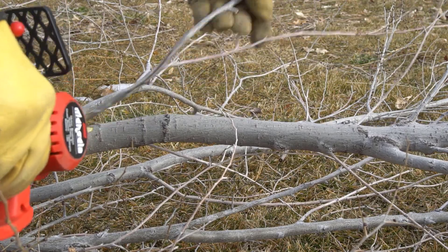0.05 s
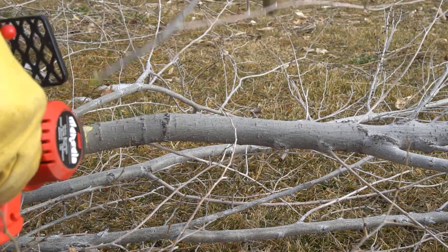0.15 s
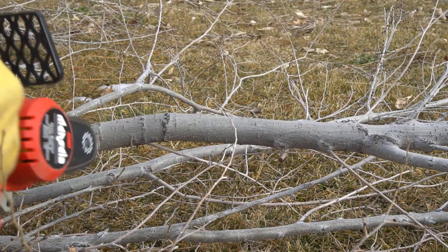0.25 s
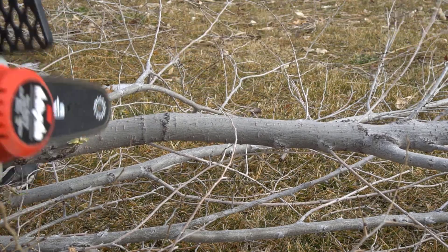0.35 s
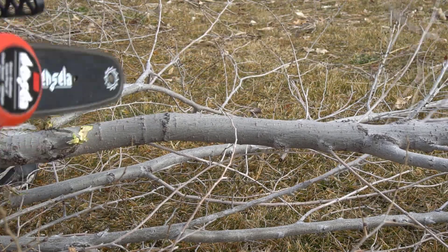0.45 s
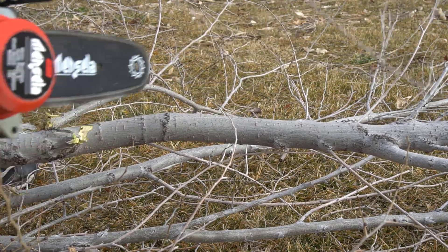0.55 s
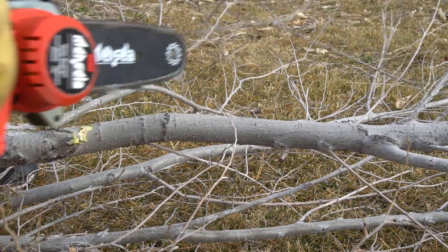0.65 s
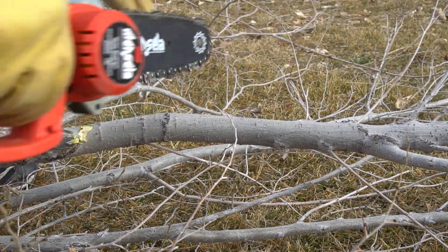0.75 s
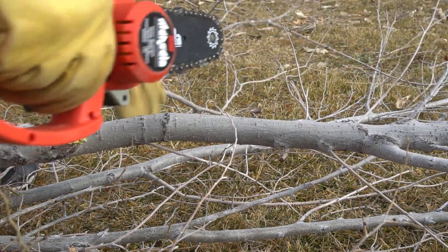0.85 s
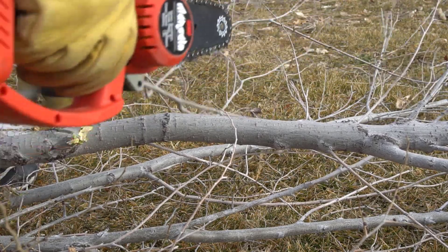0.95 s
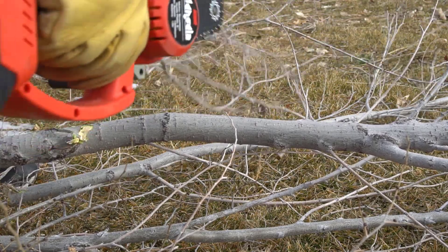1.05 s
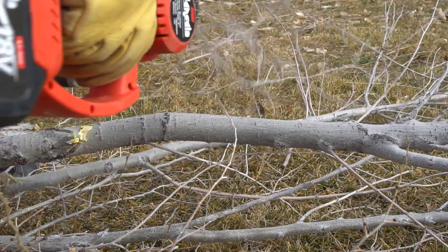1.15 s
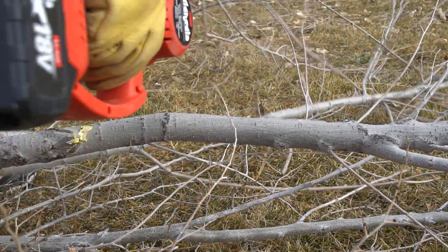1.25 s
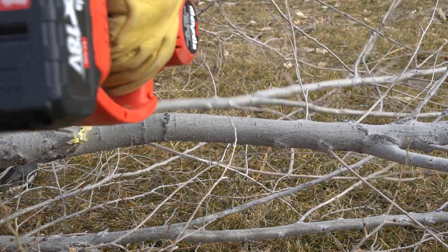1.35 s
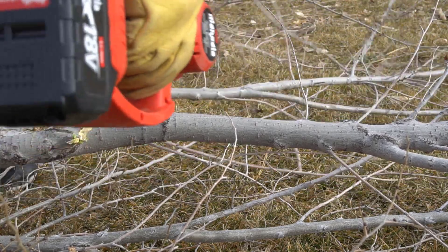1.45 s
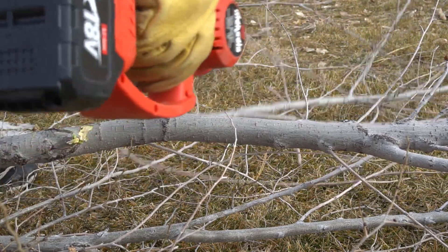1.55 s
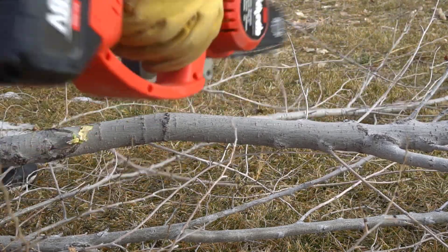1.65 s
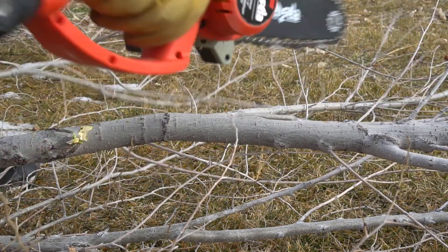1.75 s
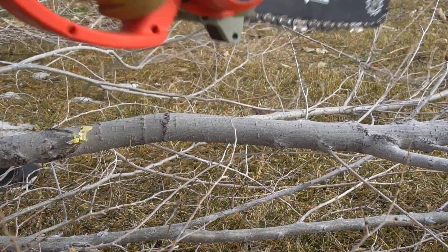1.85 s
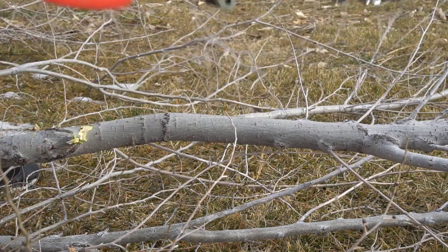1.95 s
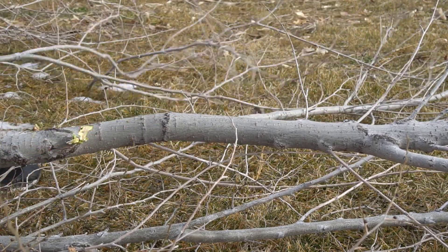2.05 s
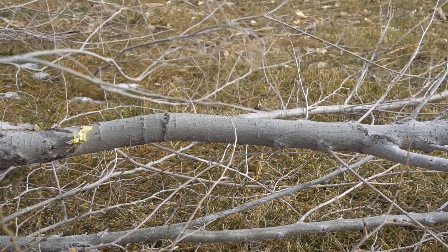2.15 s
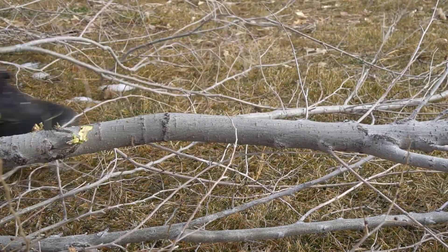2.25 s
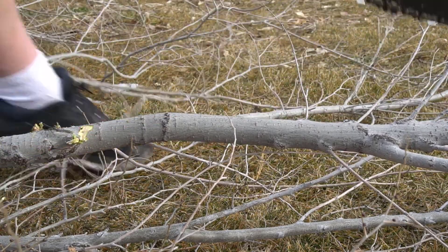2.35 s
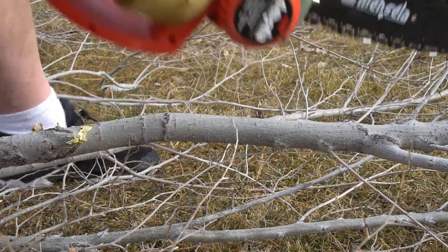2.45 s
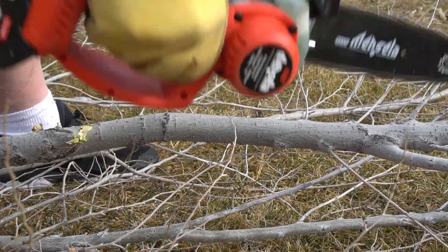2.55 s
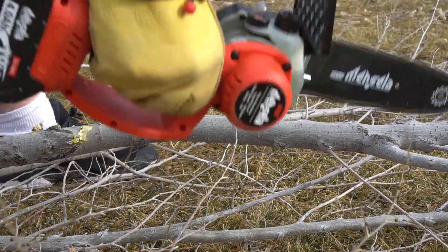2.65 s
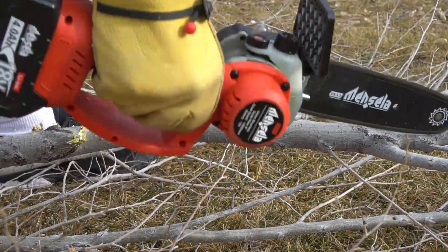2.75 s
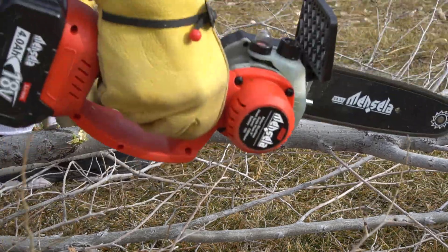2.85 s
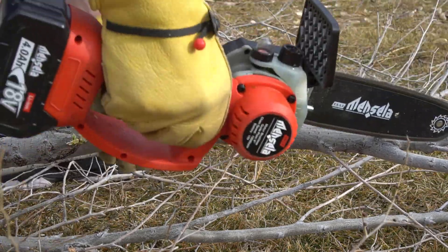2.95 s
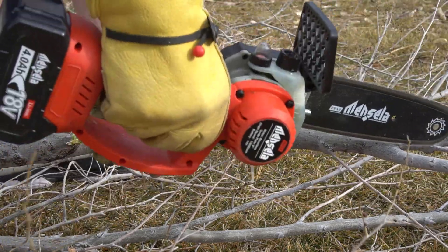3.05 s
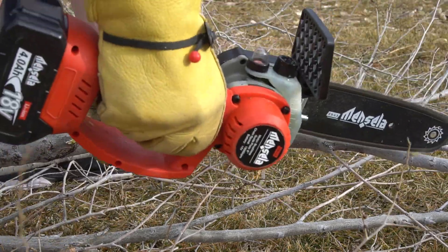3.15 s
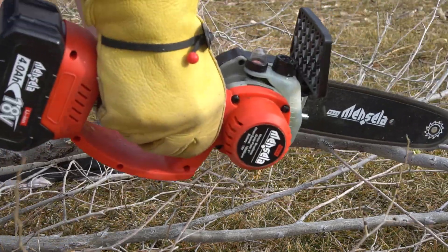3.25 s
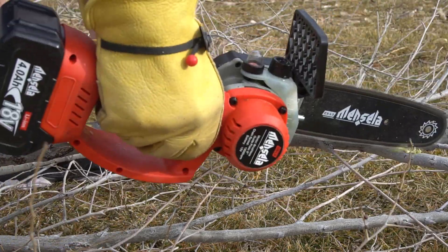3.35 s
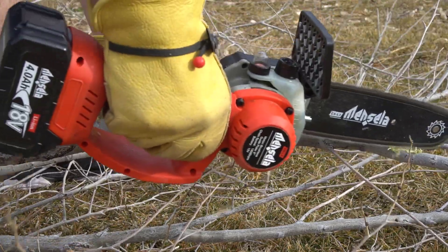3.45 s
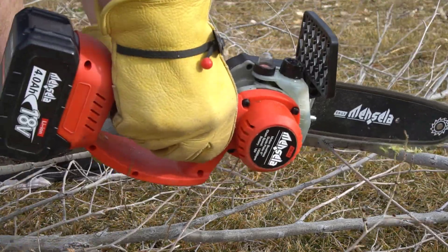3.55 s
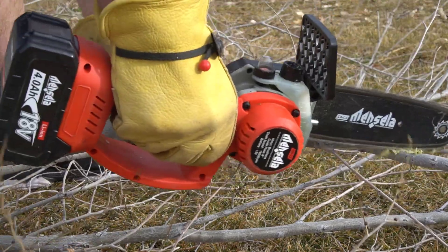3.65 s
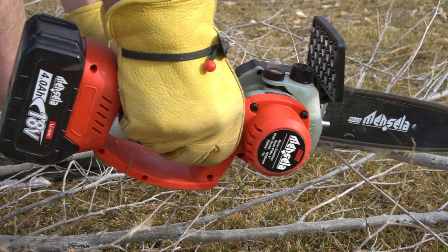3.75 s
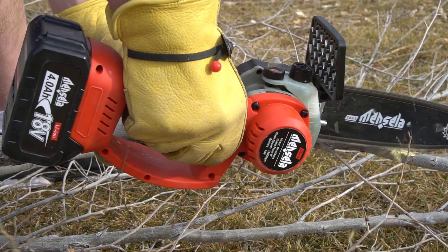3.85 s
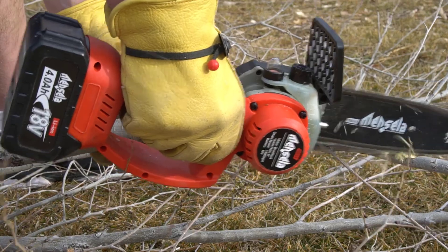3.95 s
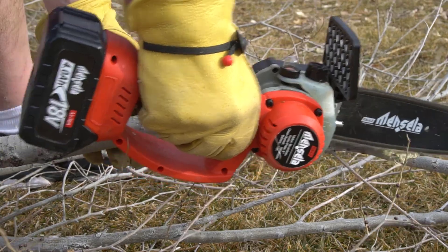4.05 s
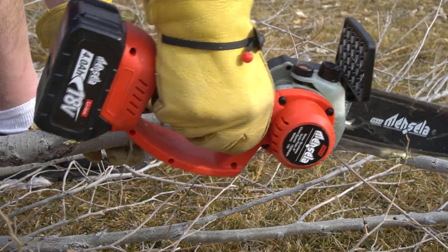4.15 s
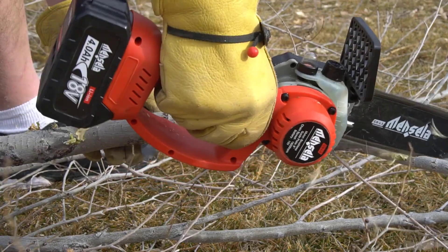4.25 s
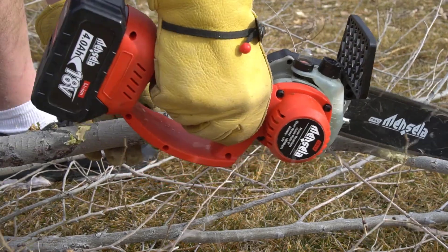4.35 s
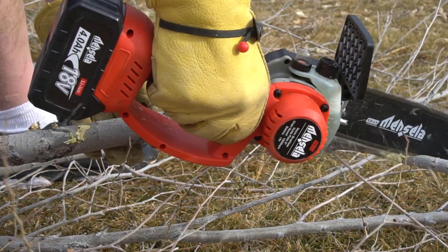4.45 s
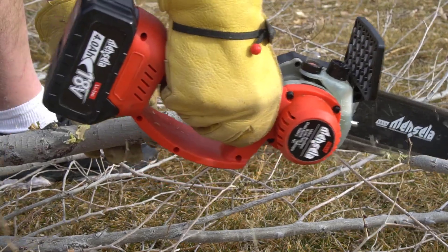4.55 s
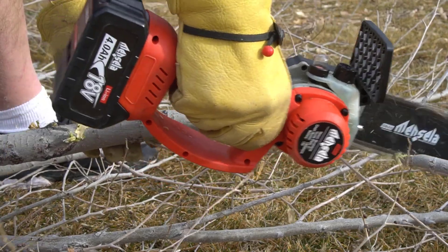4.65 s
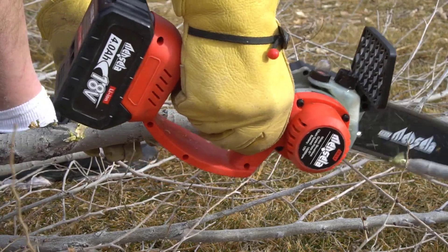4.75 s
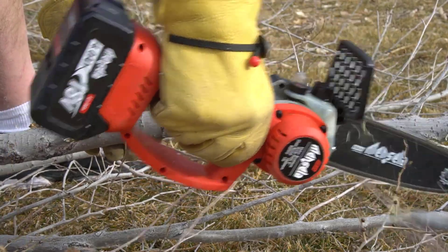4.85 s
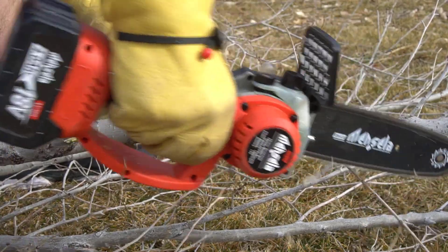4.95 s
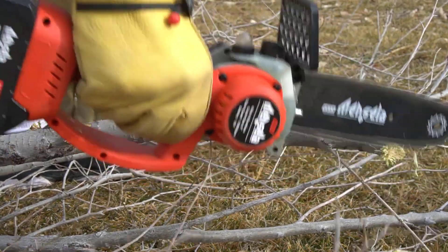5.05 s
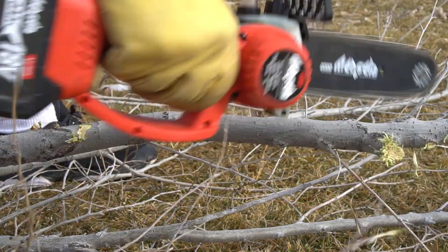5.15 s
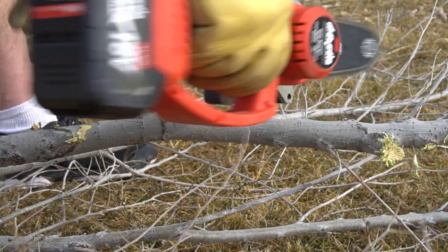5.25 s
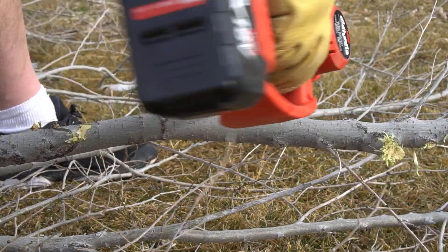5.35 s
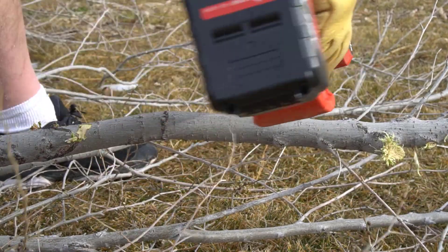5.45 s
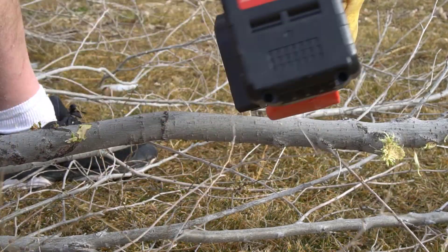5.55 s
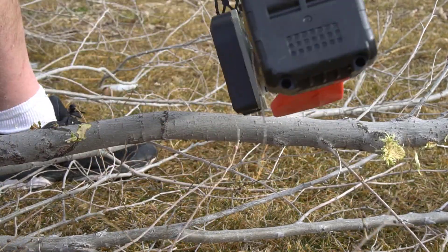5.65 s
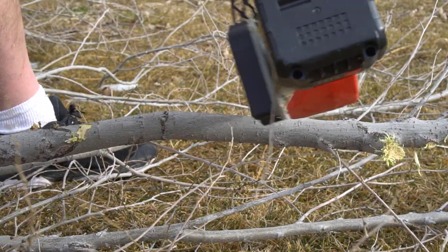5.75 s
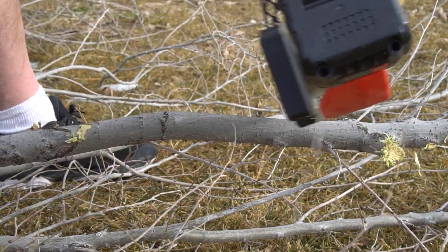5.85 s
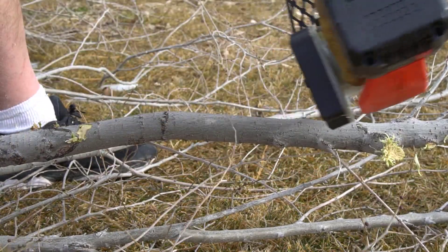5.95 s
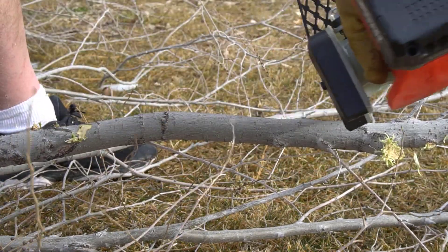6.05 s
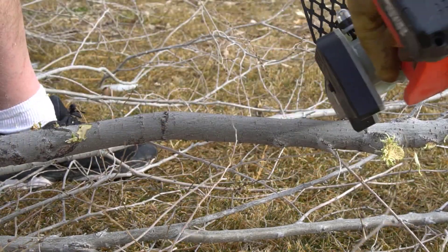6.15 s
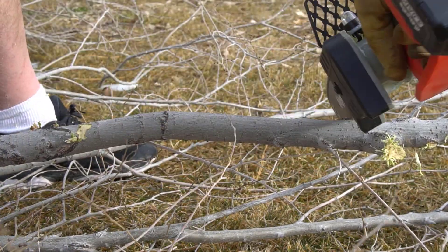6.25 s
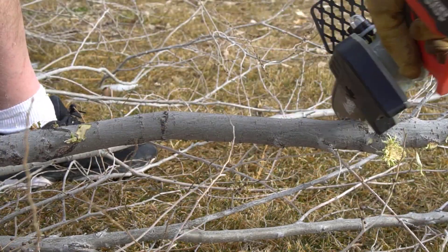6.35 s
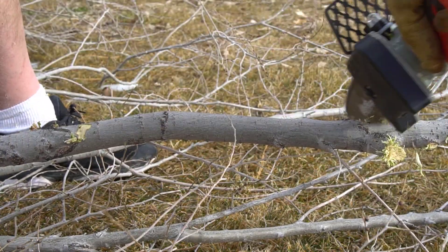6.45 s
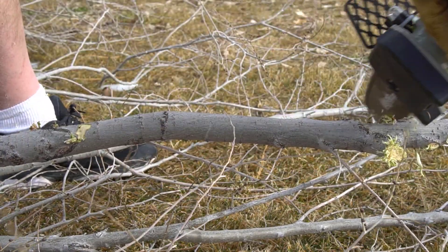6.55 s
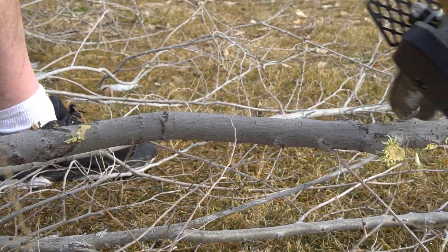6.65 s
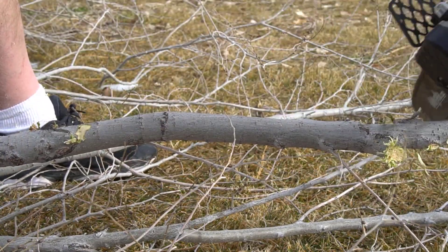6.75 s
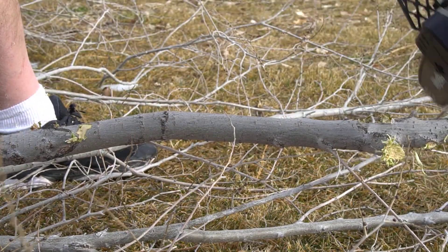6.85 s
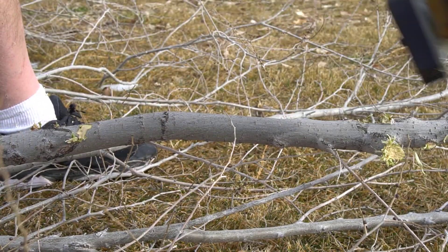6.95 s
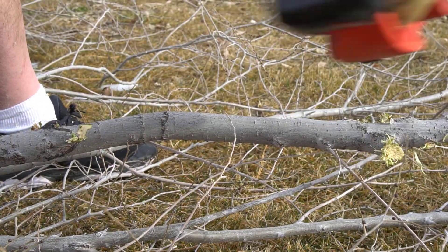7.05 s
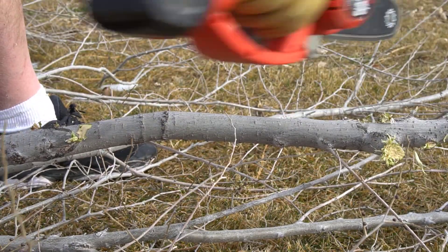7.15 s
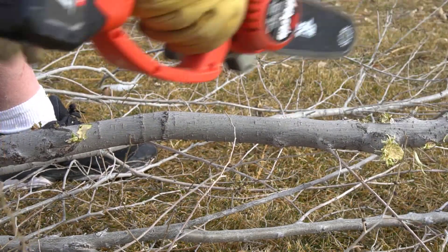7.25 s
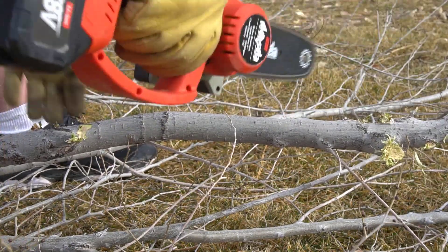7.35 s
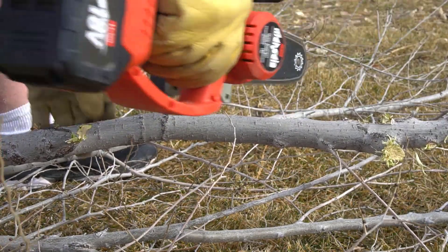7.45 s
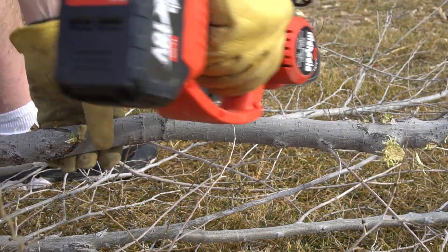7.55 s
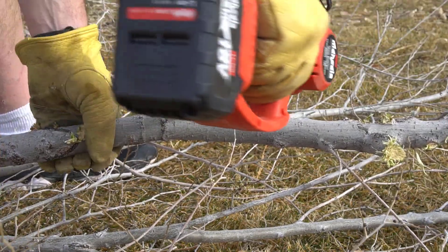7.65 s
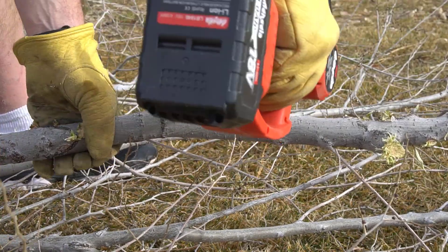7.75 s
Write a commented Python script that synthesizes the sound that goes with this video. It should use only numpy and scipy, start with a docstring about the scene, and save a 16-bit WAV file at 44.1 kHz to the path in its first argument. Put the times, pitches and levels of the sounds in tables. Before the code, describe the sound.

A handheld electric chainsaw, close and dry in open air: hissing, clattering chain links and singing gears coast to silence within a second. Small plastic ticks and brittle twigs rustle for a moment and a half. Two sharp clicks, then the motor climbs smoothly, bites wood with uneven judder, clears it, and whirrs on steadily with shifting tone as the tool turns, dipping slightly once.

```python
"""A small battery chainsaw outdoors, near a stereo pair of microphones: chain links rattle in the bar and
housing as noisy knocks through resonances, while motor, gear and fan whine as sines on the shaft speed.
It runs down, stops, soft-starts, chatters through a branch, runs free, cuts again lightly and runs free.
In the pause the trigger and twigs click as short noise bursts, and twigs rustle as clumps of tiny cracks.
Behind it all lies a distant rumble and drone of slowly uneven noise."""
import sys
import numpy as np
from scipy import signal
from scipy.fft import rfft, irfft, next_fast_len
from scipy.io import wavfile
from scipy.ndimage import uniform_filter1d, map_coordinates

SR = 44100
rng = np.random.default_rng(int(sys.argv[2]) if len(sys.argv) > 2 else 0)


def volts_from_decibels(level):
    """Turn decibel levels (scalar or array-like) into linear amplitude factors."""
    exponent = np.asarray(level, float) / 20
    return 10 ** exponent


def wav_record(signal):
    """Record a signal, one row per channel, as 16-bit PCM in the file named by sys.argv[1]."""
    frames = np.transpose(np.atleast_2d(signal))
    bounded = np.clip(frames, -1, 1)
    # unit amplitude maps onto the largest positive 16-bit level
    quanta = np.round(bounded * 32767).astype(np.int16)
    wavfile.write(sys.argv[1], SR, quanta)


N = 344421  # length in samples

# speed of the motor shaft: t/s, speed/turns per s
SHAFT_SPEED = [(0, 268), (.2, 282), (.4, 283), (.85, 60), (2.5, 70), (2.67, 100), (2.95, 155), (3.07, 178),
               (3.23, 206), (3.38, 233), (3.44, 250), (3.72, 259), (3.97, 279), (4.06, 260), (4.7, 264),
               (4.9, 281), (5, 282.6), (6.05, 283), (6.3, 274), (6.7, 275), (6.9, 282.6), (7.81, 283)]
# the chain is in the wood: start/s, end/s, load/0-1
CUTS = [(3.473, 4.84, 0.66), (6.16, 6.83, 0.04)]
# rattle level, including its fall as the chain runs down, and how the saw is turned and placed:
# t/s, bar level/dB, motor side turned to the microphones/0-1, left over right/dB
RATTLE_AND_PLACE = [(0, -25.5, 0.8, 2), (.3, -25.5, 1, 2.2), (.5, -28.5, 1, 2), (.65, -33, 1, 1),
                    (.81, -49, .6, 3.5), (.89, -72, .3, 5), (2.5, -27, 0, -2.5), (2.7, -22, 0.14, -2.5),
                    (3, -22, 0.2, -2.1), (3.2, -24, 0.34, -2.5), (3.42, -22.5, 0.15, -2.3),
                    (3.6, -23.5, 0.12, -2.5), (3.88, -23, 0, -3), (4.2, -26, 0.04, -3.5),
                    (4.8, -26, 0.29, -3.1), (5.15, -24, 0.3, -1), (5.35, -27, 0.72, -1.8),
                    (5.7, -25.5, 0.68, -1.6), (6.14, -25.5, 0.77, -2.5), (6.3, -23, 0.44, -2.5),
                    (6.65, -25, 0.58, -4), (6.93, -26.5, 0.52, -4.5), (7.08, -24.5, 0.46, -3.5),
                    (7.3, -27, 1, -0.5), (7.81, -25, 0.63, -1.4)]
# short bumps in the rattle, most of them while cutting: t/s, jolt/dB before each part takes its share
BUMPS = [(2.7, 1.5), (3.745, 4), (4.035, 3), (4.078, 1.5), (4.135, 3), (4.168, 4), (4.196, 4.5), (4.25, 5),
         (4.305, 4.5), (4.336, 4), (4.387, 6), (4.439, 6.5), (4.483, 5), (4.521, 5), (4.585, 5),
         (4.65, 3.5), (4.696, 5), (4.764, 1.5), (4.846, 3.5), (7.468, 2)]
# short jolts in the rattle, nearly all dips, most of them while cutting:
# t/s, jolt/dB before each part takes its share
DIPS_MOSTLY = [(2.73, -2), (3.476, -5), (3.563, -5.5), (3.72, -3), (4.017, -8.5), (4.107, -5), (4.215, -1),
               (4.277, -2.5), (4.461, 0.5), (4.67, -2), (6.394, -2.5), (6.479, -1.5), (6.631, -4),
               (6.808, -3.5), (7.521, -4.5)]
# the housing rings out louder for a while: start/s, end/s, gain/dB
RINGING = [(-.1, .25, 3.5), (0.506, .72, 3.5), (2.883, 3.218, 5.5), (5.32, 5.757, 4.5), (6.154, 6.5, 3),
           (7.404, 7.9, 2.5)]
# resonances of the steel bar: f/Hz, width/Hz, relative level/dB
BAR_MODES = [(3580, 425, -8), (4290, 600, -6), (5310, 1600, -7.5), (7220, 910, -5.5), (8430, 555, -2),
             (9500, 530, -8)]
# hissing treble of the links, relative: f/Hz, level/dB
SIZZLE_SPECTRUM = [(7000, -30), (8300, -20), (9600, 3), (10800, 3.5), (12000, 3.5), (13700, 5), (16000, -3)]
# resonances of the plastic parts, before the rattle sharpens them: f/Hz, width/Hz, relative level/dB
HOUSING_MODES = [(1160, 237, -3), (1246, 220, 3.5)]
HANDLE_MODES = [(992, 170, -10.5), (1044, 68, 0.5), (1101, 250, -7.5)]
BATTERY_MODES = [(450, 140, -6), (810, 170, 0)]
GUARD_MODES = [(2007, 397, -0.5), (2216, 333, 1), (2830, 890, -4)]
# each part against the bar: turned away/dB, gained when facing/dB, gained as the speed nears zero/dB
SIZZLE_LEVEL = (-2.5, 7.5, 1)
HOUSING_LEVEL = (-15.5, 6, 0)
HANDLE_LEVEL = (-21, 3, 21)
GUARD_LEVEL = (-7, 2.5, 2.5)
# stereo width of bar and sizzle, same columns: away/dB, facing/dB, slow/dB
SPREAD_LEVEL = (-3, 3.5, -5)
# orders of the shaft that sing out as the saw turns in the hand; 8 motor, 10.42 gear mesh, 13 fan
# per order: start/s, end/s, level/dB before slow fading
SINGING_ORDERS = {8: [(.18, .4, -35), (2.6, 2.78, -44), (2.78, 3.03, -34.5), (5.0, 5.2, -36),
                  (5.36, 6.03, -38), (6.97, 7.19, -31), (7.38, 7.6, -37), (7.6, 7.9, -34)],
                  10.42: [(.06, .22, -34.5), (.32, .42, -36), (3.04, 3.41, -33.5), (3.76, 3.98, -39),
                  (4.87, 5.12, -35.5), (5.2, 5.58, -42), (5.7, 6.14, -37.5), (7.3, 7.52, -40.5)],
                  13: [(.16, .4, -34), (4.88, 5.1, -36), (5.14, 5.56, -36), (7.0, 7.5, -32),
                  (7.5, 7.9, -36)]}
# weaker shaft orders that hum: multiple of shaft speed, level/dB before speed, load and resonance
HUM_ORDERS = [(1, -57.5), (1.517, -56.5), (3.034, -66), (4, -48)]
# weaker shaft orders that whistle: multiple of shaft speed, level/dB before resonance
WHISTLE_ORDERS = [(16, -51), (20, -54), (20.84, -50)]
# trigger and twig clicks: t/s, relative level/dB, duller body relative to that/dB
CLICKS = [(0.8403, -36, 5), (0.863, -20, -9), (1.0401, -49, -15), (1.1678, -35, -9), (1.212, -33, -20),
          (1.302, -37, -20), (1.3872, -41, -22), (1.665, -46, -12), (1.833, -43, -17), (2.0537, -33, -29),
          (2.2423, -46, 1), (2.2653, -43, -12), (2.366, -28.5, -30), (2.4318, -27.5, -18),
          (2.468, -12.5, -22), (2.515, -14, -2.5)]
# small plastic and wood resonances: f/Hz, width/Hz, level/dB
CLICK_MODES = [(3040, 200, -7), (6400, 126, 5.5), (7750, 410, -7.5), (8870, 180, -18), (11600, 200, -29)]
# rustles: start/s, end/s, hiss level/dB, fade/dB per s, scrape over hiss/dB
RUSTLES = [(1.016, 1.17, -72, 14, -24), (1.168, 1.56, -48.5, 31, -23), (1.56, 1.674, -60, -20, -16),
           (2.05, 2.203, -64, -10, 4), (2.253, 2.48, -64.5, -26, -4)]
# hiss of the rustling, relative: f/Hz, level/dB
RUSTLE_SPECTRUM = [(1470, -44), (2500, -7.5), (4390, -3.5), (4690, -3.5), (6190, -2), (15000, -2.5)]
# distant background before its slow unevenness: t/s, rumble/dB, drone/dB
FAR_LEVELS = [(0, -56.5, -49.5), (1, -49, -51), (1.9, -45, -50.5), (2.2, -43.5, -49.5), (2.6, -46.5, -47),
              (3.06, -48.5, -51.5), (3.5, -56.5, -55.5), (4.8, -59, -60.5), (5.4, -51, -54.5),
              (6.1, -53.5, -51.5), (7, -55.5, -54), (7.81, -57, -52.5)]
# spectra of the two distant sounds, relative: f/Hz, level/dB
RUMBLE_SPECTRUM = [(15, -44), (25, -33), (46, -3), (85, 4.5), (220, -9.5), (290, -23), (480, -120)]
DRONE_SPECTRUM = [(110, -34), (180, 3.5), (446, -6), (612, -13), (935, -22), (1410, -19), (2130, -31),
                  (3000, -36.5), (3900, -58), (6600, -120)]
# how alike left and right are at normal spread: f/Hz, likeness/0-1
ALIKE = [(60, 1), (250, 1), (600, 1), (1500, 0.95), (2600, 0.86), (4600, 0.81), (7000, 0.59), (9000, 0.79),
         (11000, 0.51), (12500, .35), (14500, 0.59)]
# imbalance of the microphone ports: f/Hz, left over right/dB
PORT_BALANCE = [(600, 0), (1400, .5), (2500, -.8), (4600, 1.8), (8400, -.5), (12000, 0)]

FREE_SPEED = 283  # turns per s, unloaded
RELEASE_S, STOP_S, START_S = .4, .89, 2.507  # trigger let go, chain still, trigger pulled


def saw():
    """The turning shaft drives both the link rattle and the whine, heard from where the saw is."""
    t = np.arange(N) / SR
    speed, = curves(SHAFT_SPEED)
    turns = np.cumsum(speed) / SR
    crawl = 1 - speed / FREE_SPEED
    load = sum(share * window(start, end, edge_s=0.21) for start, end, share in CUTS)
    bar_db, facing, pan_db = curves(RATTLE_AND_PLACE)
    # without current the whine dies before the chain stops
    powered = np.where(t < STOP_S, volts_from_decibels(-500 * np.maximum(t - RELEASE_S, 0)), 1)
    # at the start the chain takes up its slack in 12 ms
    on = (t < STOP_S) + np.clip((t - START_S) / .012, 0, 1)
    rattle = patchy(link_rattle(speed, turns, crawl, load, facing), patchy_db=1.5)
    return placed(on * (volts_from_decibels(bar_db) * rattle + powered * whine(turns, speed, crawl, load)), pan_db)


def link_rattle(speed, turns, crawl, load, facing):
    """Links slam round sprocket and bar and ring every part of the tool."""
    def part_db(level):
        away_db, faced_db, slow_db = level
        return away_db + faced_db * facing + slow_db * crawl

    jolts_db = chatter(load)
    # the geared-down sprocket runs a little out of round
    sprocket_db = .6 * np.sin(2 * np.pi * .1835 * turns + .5 * wobble(6))
    links = knocks(1.517 * speed, scatter_db=1, most_db=18, life_ms=2.8, steady=0.97)
    links = links * volts_from_decibels(sprocket_db + 0.47 * wobble(40))

    spread = volts_from_decibels(part_db(SPREAD_LEVEL))
    bar = pair(modes(BAR_MODES), links, spread)
    sizzle = volts_from_decibels(part_db(SIZZLE_LEVEL)) * pair(colour(SIZZLE_SPECTRUM), links, spread)
    rattle = volts_from_decibels(0.91 * jolts_db) * (bar + sizzle)

    ringing_db = sum(db * window(start, end, edge_s=0.073) for start, end, db in RINGING)
    plastic = ((part_db(HOUSING_LEVEL) + ringing_db, HOUSING_MODES),
               (part_db(HANDLE_LEVEL), HANDLE_MODES),
               (-20.5, BATTERY_MODES),  # dB against the bar
               (part_db(GUARD_LEVEL), GUARD_MODES))
    # plastic follows the chatter less than steel, and comes and goes as the grip shifts
    for db, table in plastic:
        moving_db = db + 0.76 * jolts_db + 0.86 * wobble(25) + 0.75 * wobble(7)
        rattle += volts_from_decibels(moving_db) * pair(lambda f: np.abs(modes(table)(f)) ** 1.3, links)
    # the echo off the ground cancels a narrow band
    return filtered(rattle, lambda f: 1 - .75 * modes([(620, 220, 0)])(f))


def chatter(load):
    """Short bumps and dips of the rattle level in dB, plus a random judder."""
    t = np.arange(N) / SR

    def jolts(rows, half_width_s):
        return sum(db * np.exp(-((t - s) / half_width_s) ** 2) for s, db in rows)

    judder = (0.51 - 0.03 * load) * wobble(22)
    return jolts(BUMPS, 0.0084) + jolts(DIPS_MOSTLY, .012) + judder


def whine(turns, speed, crawl, load):
    """Motor, gear and fan sing at orders of the shaft, less steadily under load."""
    # phase wander in rad at order 10: running free, added at a crawl, added under load
    unsteady = .5 + .9 * crawl + 3 * np.sqrt(np.abs(load))
    # the hum grows 12 dB per octave of speed and drowns under load
    hum_db = 12 * np.log2(speed / FREE_SPEED) - 14 * load

    def tone(order, db):
        level = np.sqrt(2) * volts_from_decibels(db + 1.37 * wobble(16) + 1.8 * wobble(6))
        return level * np.sin(order * (2 * np.pi * turns + unsteady * wobble(45) / 10))

    def swell(rows):
        # -58 dB remains between the songs
        return volts_from_decibels(-58) + sum(volts_from_decibels(db) * window(start, end, edge_s=.06) for start, end, db in rows)

    singing = sum(swell(rows) * tone(order, 0) for order, rows in SINGING_ORDERS.items())
    whistle = sum(tone(order, db) for order, db in WHISTLE_ORDERS)
    # the high orders swell when they sweep through a narrow mode of the guard
    whistle += volts_from_decibels(22.0) * filtered(whistle, lambda f: modes([(2390, 160, 0)])(f) ** 2)
    hum = sum(tone(order, db + hum_db) for order, db in HUM_ORDERS)
    # the hum swells likewise in the upper mode of the battery
    hum += volts_from_decibels(9) * filtered(hum, lambda f: modes(BATTERY_MODES[1:])(f) ** 2)
    return singing + whistle + hum


def patchy(x, patchy_db):
    """Many small unnamed resonances fade in and out as the tool moves."""
    z = signal.stft(x, nperseg=512)[2]
    field = uniform_filter1d(rng.standard_normal(z.shape[1:]), size=3, axis=0)  # across pitch
    field = uniform_filter1d(field, size=20, axis=1)  # along time
    return signal.istft(z * volts_from_decibels(patchy_db * unit(field)), nperseg=512)[1][:, :N]


def placed(x, pan_db):
    """A source off to one side is some microseconds earlier there, and louder above the bass."""
    lead = 2.6e-6 * SR * pan_db  # in samples
    x = np.array([map_coordinates(ear, [np.arange(N) + side * lead], order=5)
                  for side, ear in zip((1, -1), x)])
    bass = filtered(x, lambda f: 1 / (1 + (f / 1100) ** 2))
    return bass + volts_from_decibels(np.array([pan_db, -pan_db]) / 2) * (x - bass)


def clicks():
    """Sharp cracks ring small plastic and wood resonances, some with a duller body."""
    tick, body = np.zeros(N), np.zeros(N)
    t = np.arange(SR // 20) / SR
    # a very short snap over a slightly longer tail
    crack = volts_from_decibels(-60 * t / 0.018) + 4 * volts_from_decibels(-60 * t / 0.0015)
    for s, db, body_db in CLICKS:
        here = slice(round(s * SR), round(s * SR) + len(t))
        tick[here] += volts_from_decibels(db - 5) * crack * rng.standard_normal(len(t))
        body[here] += volts_from_decibels(db + body_db + 8 - 60 * t / 0.045) * rng.standard_normal(len(t))
    dull = filtered(body, modes([(500, 77, 0), (1200, 210, 0), (2380, 490, 0)]))
    x = 0.36 * tick + filtered(tick, modes(CLICK_MODES)) + dull
    # the right side is weaker and one sample late
    return np.array([x, 0.73 * np.roll(x, 1)])


def twigs():
    """Dry twigs and a glove rustle in clumped small cracks; one twig swishes along the bark."""
    t = np.arange(N) / SR

    def shape(start, end, db, fade):
        return window(start, end, edge_s=0.061) * volts_from_decibels(db - fade * np.clip(t - start, 0, 1))

    still_db = -61  # the twigs never fall quite still
    hiss = volts_from_decibels(still_db) + sum(shape(start, end, db, fade) for start, end, db, fade, _ in RUSTLES)
    rough = volts_from_decibels(still_db - 8) + sum(shape(start, end, db + scrape_db, fade)
                                    for start, end, db, fade, scrape_db in RUSTLES)
    cracks = knocks(300 * volts_from_decibels(2.5 * wobble(20)), scatter_db=4, most_db=12, life_ms=2, steady=.6)
    scrape_modes = modes([(1380, 1100, 0.5), (2010, 600, 6), (3230, 1200, -0.5)])
    scrape = rough * pair(scrape_modes, cracks, spread=3.7)
    swish_modes = modes([(3050, 120, -6), (5000, 200, 0)])
    swish = volts_from_decibels(-63) * window(1.3, 1.62, edge_s=.08) * pair(swish_modes, cracks)
    return hiss * pair(colour(RUSTLE_SPECTRUM), cracks, spread=1.1) + scrape + swish


def far():
    """A distant rumble and drone: coloured noise, slowly uneven."""
    rumble_db, drone_db = curves(FAR_LEVELS)
    rumble = volts_from_decibels(rumble_db + 2.2 * wobble(7.4)) * pair(colour(RUMBLE_SPECTRUM))
    drone = volts_from_decibels(drone_db + 1.8 * wobble(2.98)) * pair(colour(DRONE_SPECTRUM))
    return rumble + drone


def knocks(rate, scatter_db, most_db, life_ms, steady):
    """Envelope of uneven blows at a moving rate, each dying fast, over a steady scrape."""
    count = np.cumsum(rate) / SR
    draw = rng.random((int(count[-1]), 2))  # one blow per count: its moment and its strength
    at = np.searchsorted(count, np.arange(len(draw)) + draw[:, 0]).clip(0, N - 1)
    strength_db = np.minimum(-scatter_db * np.log(draw[:, 1]), most_db)
    blows = np.bincount(at, volts_from_decibels(strength_db), N)
    return steady + unit(signal.lfilter([1], [1, -np.exp(-1000 / (life_ms * SR))], blows))


def pair(response, gate=1, spread=1):
    """Gated stereo noise with a centre of rms 1; spread widens what left and right do not share."""
    def split(hz):
        turn = np.arccos(np.clip(along(ALIKE, hz), -1, 1)) / 2
        return response(hz) * np.array([np.cos(turn), np.sin(turn)])

    mid, side = filtered(gate * rng.standard_normal((2, N)), split)
    return np.array([mid + spread * side, mid - spread * side]) / np.std(mid)


def modes(table):
    """Response of a set of resonances, neighbours in opposite sign."""
    def response(f):
        return sum((-1) ** k * volts_from_decibels(db) * 1j * f * width / (centre ** 2 - f * f + 1j * f * width)
                   for k, (centre, width, db) in enumerate(table))
    return response


def colour(spectrum):
    """Response of a (Hz, dB) spectrum."""
    return lambda f: volts_from_decibels(along(spectrum, f))


def filtered(x, response):
    """x times a response given as a function of frequency."""
    m = next_fast_len(N + 8192)
    return irfft(rfft(x, m) * response(np.fft.rfftfreq(m, 1 / SR)), m)[..., :N]


def along(points, hz):
    """Reads (Hz, value) points on a log frequency axis."""
    f, v = np.transpose(points)
    return np.interp(np.log(hz + 1), np.log(f + 1), v)


def curves(rows):
    """One value per sample for each column after the time."""
    s, *cols = np.transpose(rows)
    return [np.interp(np.arange(N) / SR, s, c) for c in cols]


def wobble(rate):
    """A smooth random curve through rate random points a second."""
    points = rng.standard_normal(int(N * rate / SR) + 4)
    return map_coordinates(points, [np.arange(N) * rate / SR])


def window(start, end, edge_s):
    """Ramps from 0 to 1 around start and back around end, each ramp edge_s long."""
    t = np.arange(N) / SR
    return np.clip(np.minimum(t - start, end - t) / edge_s + .5, 0, 1)


def unit(x):
    """Scaled to rms 1."""
    return x / np.sqrt(np.mean(x ** 2) + 1e-20)


def scene():
    """Saw, clicks, twigs and distance, added in the open air."""
    return saw() + clicks() + twigs() + far()


def low_pass(x):
    """Removes everything above the highest recorded frequency."""
    return signal.sosfilt(signal.butter(12, 16990, fs=SR, output="sos"), x)


def record(dry):
    """Unequal microphone ports, gently rounded peaks and a band limit shape the finished mix."""
    left_right = np.array([[1], [-1]])
    ports = filtered(dry, lambda hz: volts_from_decibels(left_right * along(PORT_BALANCE, hz) / 2))
    rounded = ports / (1 + np.abs(ports / .75) ** 4) ** (1 / 4)
    limited = filtered(rounded, lambda hz: hz < 15690)
    return low_pass(limited)


dry = scene()
out = record(dry)
wav_record(out)
```